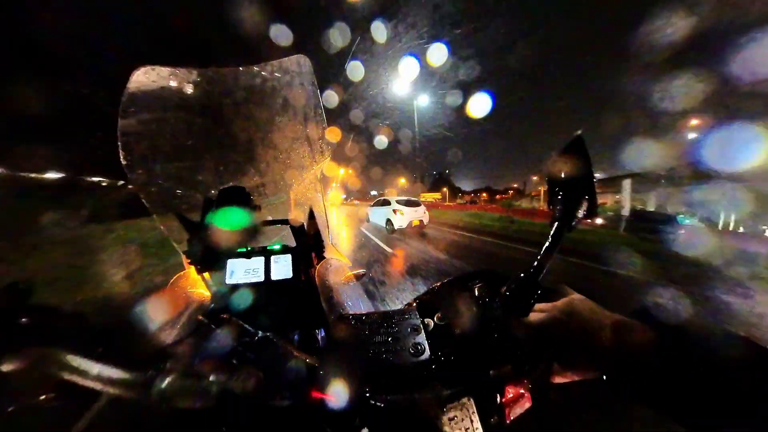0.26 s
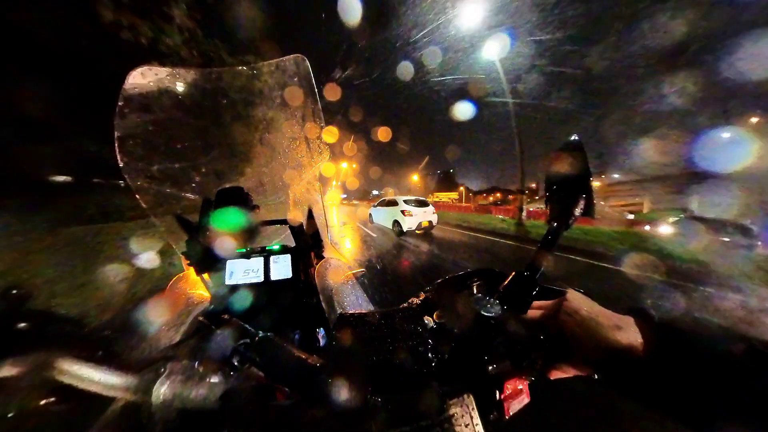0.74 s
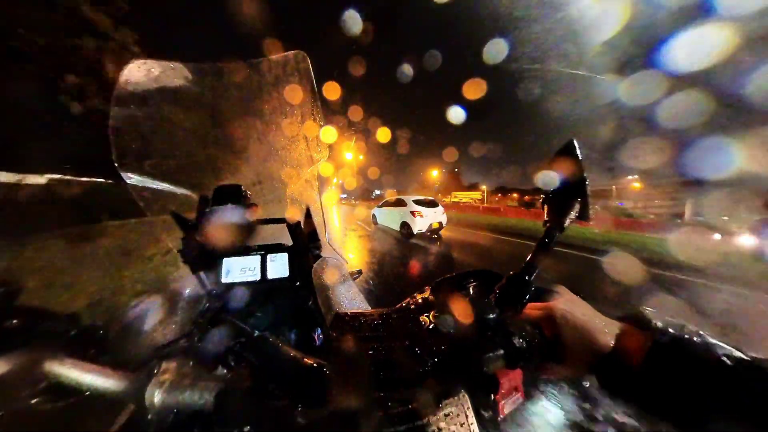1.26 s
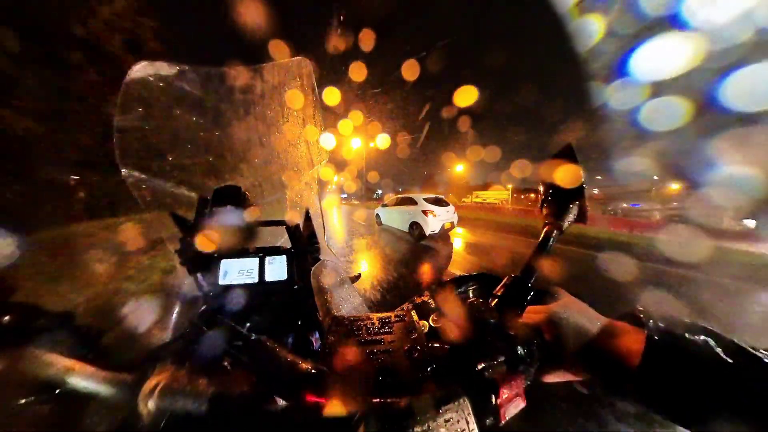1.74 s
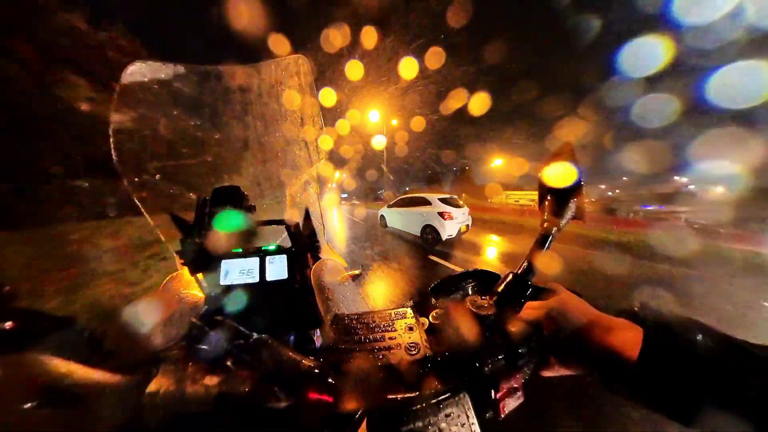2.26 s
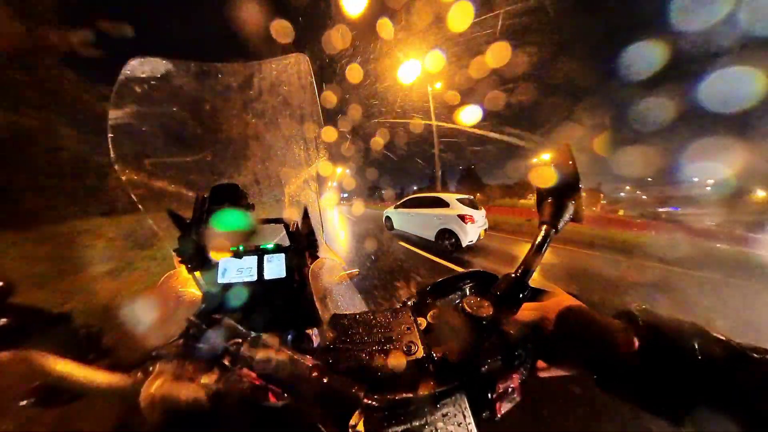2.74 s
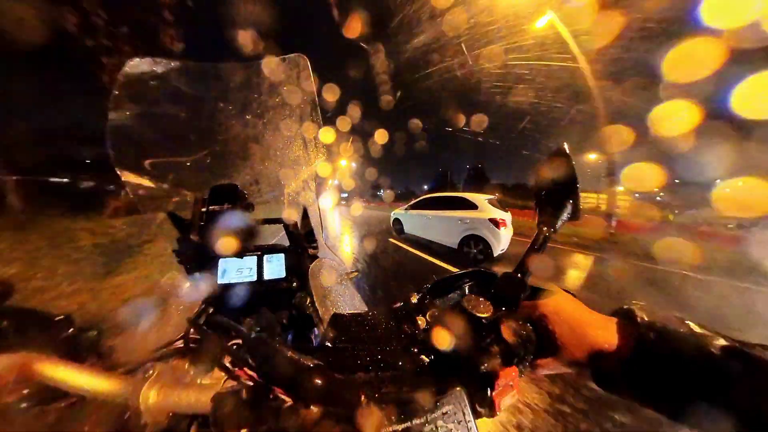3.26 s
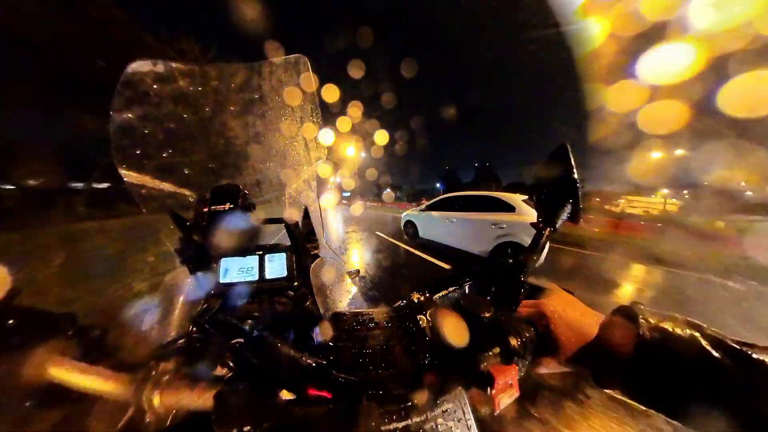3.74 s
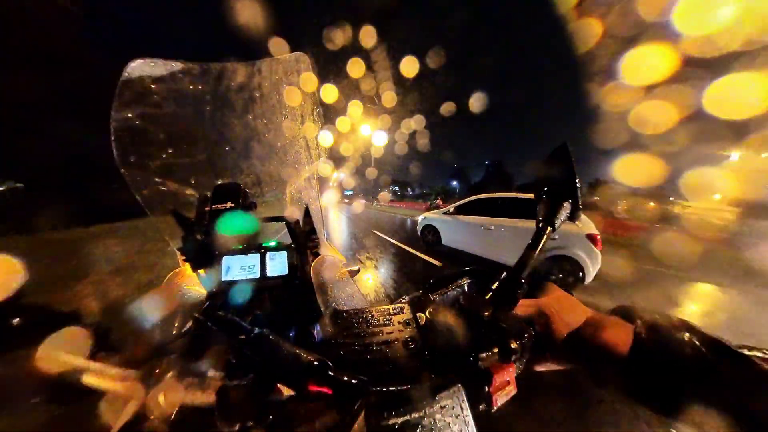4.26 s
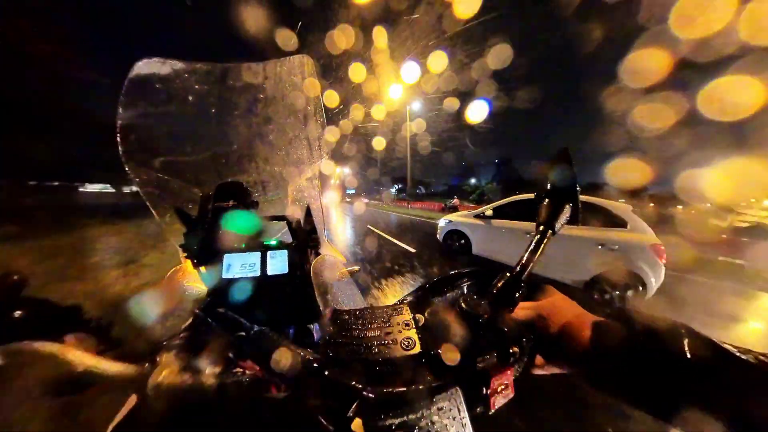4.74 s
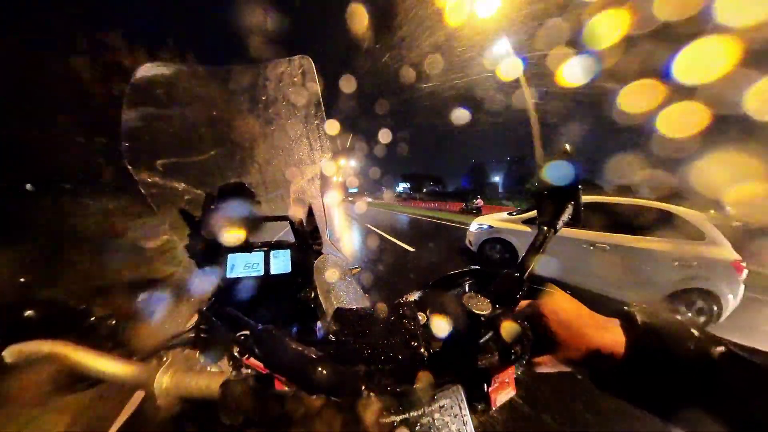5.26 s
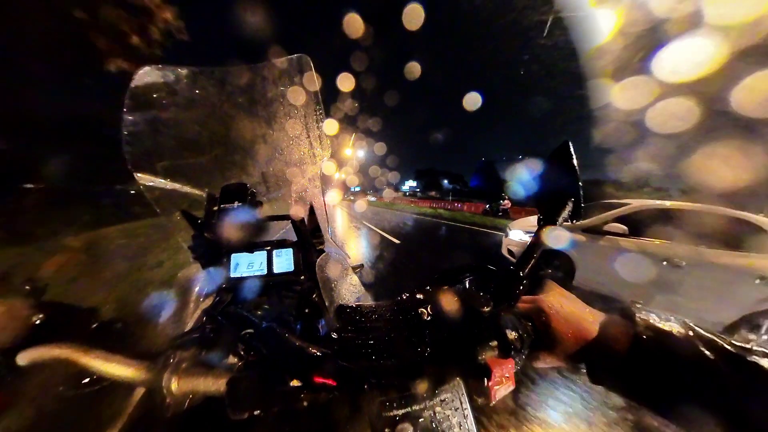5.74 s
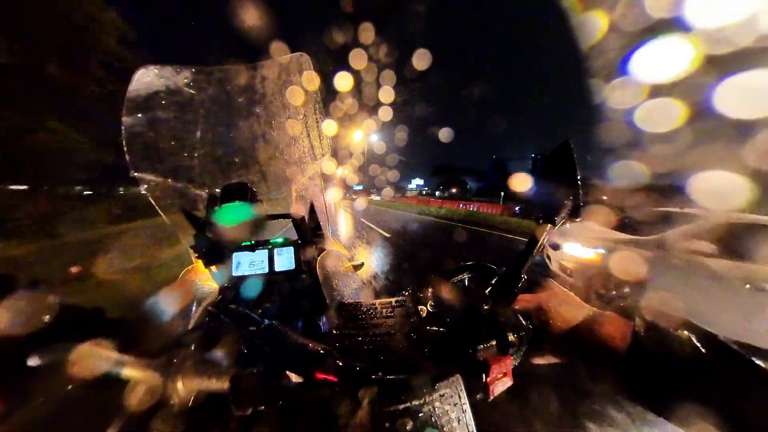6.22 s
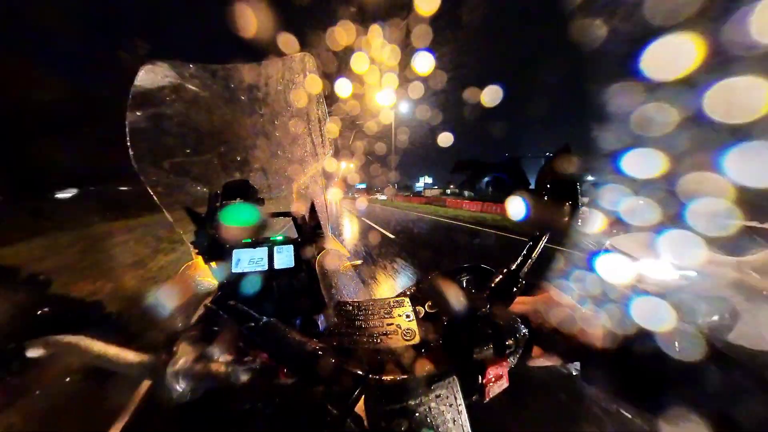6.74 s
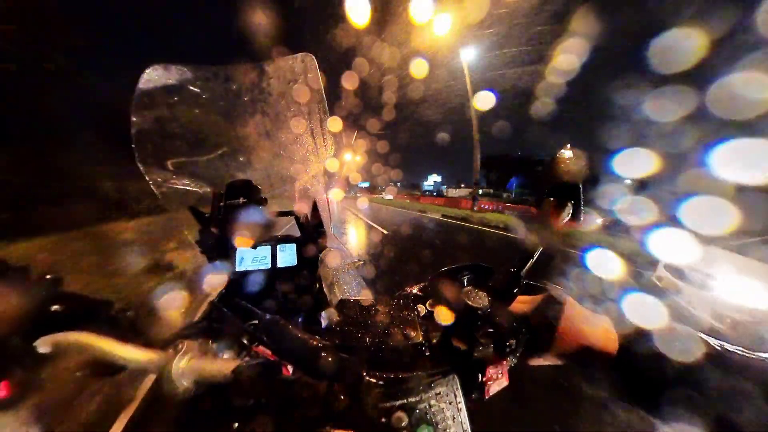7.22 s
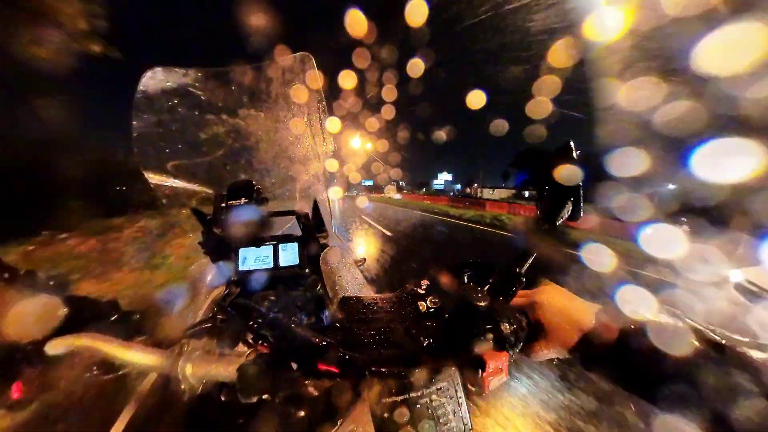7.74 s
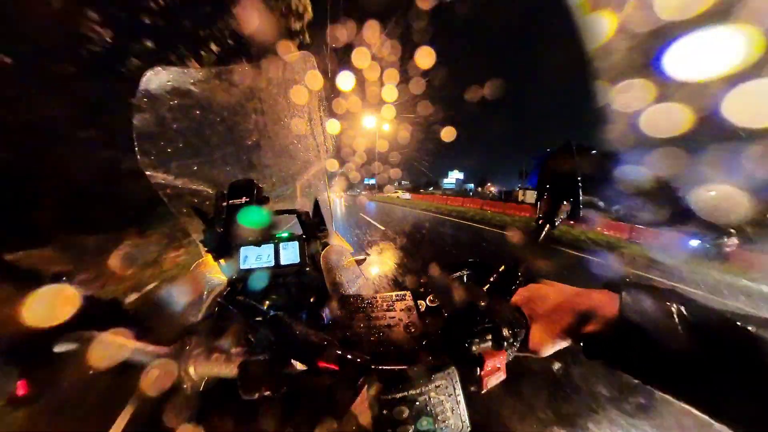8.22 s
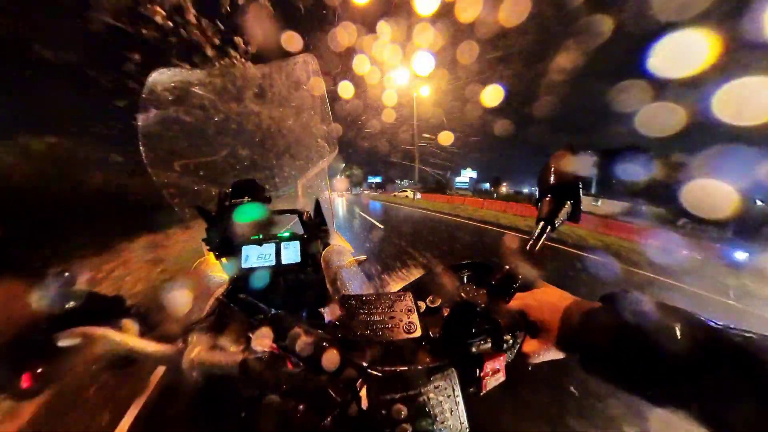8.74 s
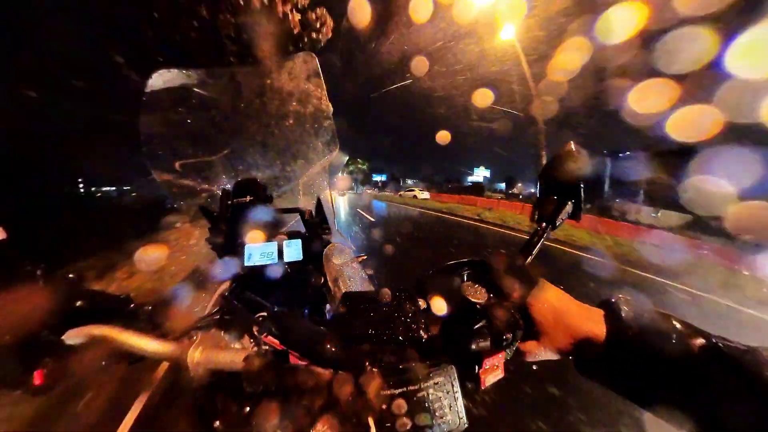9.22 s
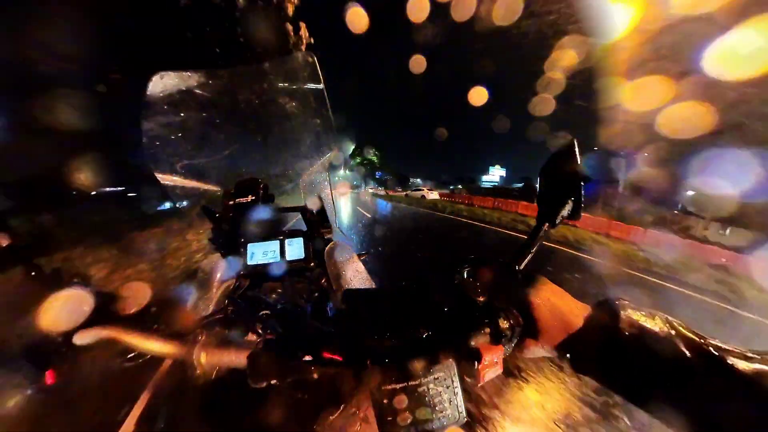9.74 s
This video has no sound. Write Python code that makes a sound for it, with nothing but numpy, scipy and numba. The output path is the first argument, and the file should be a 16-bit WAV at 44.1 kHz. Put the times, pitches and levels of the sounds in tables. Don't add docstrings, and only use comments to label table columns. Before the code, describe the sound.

A motorcycle drones steadily through hissing rain spray, buffeting wind and metal rattle, then the sound abruptly turns dull, boxy and mono, with knocks and ticking drops.

```python
import sys
import numpy as np
from scipy import signal
from scipy.fft import rfft, irfft, next_fast_len
from scipy.io import wavfile
from scipy.ndimage import uniform_filter1d, minimum_filter1d, map_coordinates
from numba import njit

SR = 44100
rng = np.random.default_rng(int(sys.argv[2]) if len(sys.argv) > 2 else 0)


def put_to_file(sound):
    columns = np.atleast_2d(sound).T
    safe = np.clip(columns, -1, 1)
    whole_steps = np.round(safe * 32767)
    wavfile.write(sys.argv[1], SR, whole_steps.astype(np.int16))


def volts_from_db(level):
    exponent = np.asarray(level, float) / 20
    return 10 ** exponent


N = 440118

SWITCH_S = 6.2195
PORT_LAG_S = .0001
# (time [s], state [0 pulling, 1 throttle shut, 2 slowed])
CASE_STATE = [
    (0, 0),
    (7.7, 0),
    (8.0, 1),
    (8.5, 1),
    (9.4, 2),
    (9.98, 2),
]


def read(rows):
    s, *columns = np.transpose(rows)
    return [np.interp(np.arange(N) / SR, s, c) for c in columns]


def at(points, hz):
    point_hz, value = np.transpose(points)
    return np.interp(np.log(hz), np.log(point_hz), value)


def unit(x):
    return x / np.sqrt(np.mean(x ** 2))


def walk(rate):
    hold = int(SR / rate)
    steps = np.repeat(rng.standard_normal(N // hold + 1), hold)
    return 1.41 * uniform_filter1d(uniform_filter1d(steps, hold), hold)[:N]


def swells(rows):
    t = np.arange(N) / SR
    return sum(db * np.exp(-((t - s) / half_s) ** 2) for s, db, half_s in rows)


def ring(x, hz, width_hz):
    return signal.lfilter(*signal.iirpeak(hz, hz / width_hz, SR), x)


def ring_twice(x, hz, width_hz):
    return ring(ring(x, hz, width_hz), hz, width_hz)


def noise(points, alike, flicker_db, rate, channels=2):
    # (frequency [Hz], left minus right [dB])
    left_over_right = [(60, -2), (100, 2.5), (180, -6), (310, 4), (530, 4), (920, 4), (1590, 3.5),
                       (2750, 6.5), (4750, 3), (8200, 4.5)]
    # (frequency [Hz], likeness [0-1])
    likeness = [(60, 1), (120, 1), (240, 0), (490, 0.6), (1000, 1), (2010, 0.4), (4060, 0), (8200, 0.94)]
    size = next_fast_len(N)
    hz = np.maximum(np.arange(size // 2 + 1) * SR / size, 1)
    common = rfft(rng.standard_normal(size))
    own = rfft(rng.standard_normal((channels, size)))
    share = np.clip(alike * at(likeness, hz), 0, 1)
    side = np.array([[.5], [-.5]])[:channels] * (channels - 1)
    lag = np.exp(-2j * np.pi * hz * (side + .5) * PORT_LAG_S * (hz > 250))
    lowest, highest = points[0][0], points[-1][0]
    colour = volts_from_db(at(points, hz) + side * at(left_over_right, hz)) * (hz > lowest) * (hz < highest)
    mix = (np.sqrt(share) * common * lag + np.sqrt(1 - share) * own) * colour
    place = 2 * np.log2(hz)
    total = 0
    for band in range(int(2 * np.log2(lowest)), int(2 * np.log2(highest)) + 2):
        window = np.clip(1 - np.abs(place - band), 0, 1)
        total = total + volts_from_db(flicker_db * walk(rate)) * irfft(mix * window, size)[:, :N]
    return unit(total)


def engine(cycle):
    # (multiple of cycle rate, left level [dB], right level [dB], left lead [rad])
    open_orders = [(2, -30, -29, 0.3), (3, -26, -23, 0.1), (4, -28, -19, -0.8), (5, -14, -18, 0.2),
                   (6, -19, -20, -0.2), (7, -29, -34, -1.6), (8, -39, -38, -2.7), (9, -21, -38, 2.6),
                   (10, -25, -18, -0.1), (11, -20, -18, -0.9), (12, -35, -33, -2.1), (13, -33, -24, -1.9),
                   (14, -31, -26, -1.0), (15, -32, -41, -0.2), (16, -25, -30, -0.3), (17, -31, -41, 0.4),
                   (18, -27, -33, -0.1), (19, -28, -35, -0.2), (20, -39, -44, -0.8), (21, -29, -36, -0.9),
                   (22, -35, -42, -0.1), (23, -44, -47, -0.4), (24, -36, -40, -0.3), (25, -41, -44, -0.5),
                   (26, -39, -47, -0.6), (27, -37, -44, -0.1), (28, -44, -51, 0.5)]
    # (multiple of cycle rate, level in state 0 [dB], in state 1 [dB], in state 2 [dB])
    case_orders = [(2, -32, -31, -30), (3, -20, -15, -19), (4, -23, -24, -16), (5, -24, -34, -31),
                   (6, -28, -23, -24), (7, -24, -31, -34), (8, -29, -31, -31), (9, -18, -17, -29),
                   (10, -19, -25, -24), (11, -34, -26, -21), (12, -41, -41, -36), (13, -35, -32, -42),
                   (14, -35, -61, -48), (15, -42, -45, -41), (16, -37, -37, -49), (17, -45, -55, -48),
                   (18, -46, -40, -39), (19, -46, -50, -52), (20, -49, -42, -49), (21, -36, -40, -43),
                   (22, -52, -45, -53), (23, -50, -45, -52), (24, -42, -45, -47), (25, -54, -54, -46),
                   (26, -50, -49, -48), (27, -51, -51, -57), (28, -60, -51, -53)]
    # (multiple, left change coasting [dB], right change coasting [dB],
    # left change at higher speed [dB], right change at higher speed [dB])
    pipe_shifts = [(3, 3, 1, -3, 3), (4, 3, 5, -2, -1), (6, 1, 1, -5, -10), (7, -1, 2, -5, -9),
                   (9, 4, 0, -7, 12), (10, -8, -10, 3, -1), (11, -10, -8, -7, -1), (13, -1, -5, 1, -8),
                   (14, -8, 0, 3, -11), (19, -3, 1, -7, -5), (21, -6, -3, 2, 2), (24, -2, -8, 5, 5),
                   (26, 5, 5, 0, 0), (27, 0, -3, 5, 5)]
    # (time [s], state [0 coasting, 1 pulling, 2 pulling at higher speed])
    open_state = [
        (0, 0),
        (1.08, 0),
        (1.2, .8),
        (2.3, 1),
        (5.4, 2),
        (9.98, 2),
    ]
    wobble_db, slip_rad = 1.2, .18
    bark_from, coast_bark_db, bark_db = 12, -4, .4
    ports, case, phase = np.zeros((2, N)), np.zeros(N), 0
    outside, inside = read(open_state)[0], read(CASE_STATE)[0]
    shifts = {k: change for k, *change in pipe_shifts}
    for (k, left_db, right_db, lead), (_, *case_db) in zip(open_orders, case_orders):
        bark = k >= bark_from
        change = shifts.get(k, [coast_bark_db * bark] * 2 + [0, 0])
        ports_db = np.array([change[:2], [0, 0], change[2:]]).T + [[left_db], [right_db]] + bark_db * bark
        angle = k * cycle + phase + slip_rad * walk(7)
        phase += np.pi * np.clip((9.5 - k) / 4, 0, 1) - .04 * max(k - 9, 0)
        phase += 1.25 * (k % 3 - 1) * (k > 9)
        size = np.sqrt(2) * volts_from_db(wobble_db * walk(5))
        tone, later = size * np.cos(angle), size * np.sin(angle)
        ports[0] += volts_from_db(np.interp(outside, range(3), ports_db[0])) * tone
        turned = np.cos(lead) * tone + np.sin(lead) * later
        ports[1] += volts_from_db(np.interp(outside, range(3), ports_db[1])) * turned
        case += volts_from_db(np.interp(inside, range(3), case_db)) * tone
    return ports, case


def beat(cycle, depth, sharp=3):
    first = np.exp(sharp * (np.cos(cycle - .1) - 1))
    second = np.exp(sharp * (np.cos(cycle - 2.4) - 1))
    return unit(1 + depth * (first + .5 * second))


def spray(cycle):
    # (frequency [Hz], level [dB per Hz])
    hiss_colour = [(350, -24), (600, -3), (900, -9), (1080, -1), (1200, -12.5), (1400, -14.5),
                   (1940, -11.5), (3740, -16.5), (5850, -15), (7000, -20), (7800, -28.5), (8600, -43.5),
                   (9300, -59)]
    # (time [s], level change [dB], half width [s])
    sheets = [(.13, 2, .05), (.72, 2, .05), (1.1, -5, .025), (1.2, -3.5, .025), (1.3, 1, 0.027),
              (1.52, -4, .04), (1.95, 1, .08), (2.35, -5, .025), (2.41, 2.5, 0.028), (2.62, -1, .05),
              (2.92, 2.5, .06), (4.4, -1.5, .07), (4.5, 0, .03), (5.0, -3.5, .04), (5.15, -7, .035),
              (5.29, -5.5, .035), (5.2, -3, 0.27), (6.12, -6, 0.055)]
    fade_db = -.5 * np.arange(N) / SR
    hiss_db = -28 + fade_db + swells(sheets) + .7 * walk(20)
    return volts_from_db(hiss_db) * beat(cycle, 0.077) * noise(hiss_colour, 0.82, 0.58, 12)


def wind():
    # (frequency [Hz], level [dB per Hz])
    wind_colour = [(20, -4), (35, -20), (60, 4), (100, -2.5), (200, -6.5), (350, -11), (600, -20.5),
                   (1000, -29.5), (1600, -47.5)]
    # (time [s], level change [dB], half width [s])
    gust_times = [
        (.15, 4.5, .08),
        (1.1, 4, 0.08),
        (1.52, 4, 0.076),
        (2.43, 5, .07),
        (3.73, 4, .08),
        (4.12, 4, .09),
        (4.4, 4.5, .06),
        (4.95, 3.5, .12),
        (5.67, 2.5, .07),
        (6.08, 5, .1),
    ]
    flutter = volts_from_db(0.83 * np.array([walk(10), walk(10)]) + 1.2 * walk(9))
    level_db = -18 + 0.33 * np.arange(N) / SR + swells(gust_times)
    return volts_from_db(level_db) * unit(flutter * noise(wind_colour, .1, 1.2, 12))


def clatter(cycle, engine_db):
    # (time [s], level change [dB], half width [s])
    judder = [
        (2.25, 3.5, .04),
        (4.16, 3.5, .03),
        (5.37, 3, .03),
        (6.13, 6, .07),
    ]
    common = rng.standard_normal(N)
    delay = np.array([[PORT_LAG_S * SR], [0]])
    shared = map_coordinates(common, [np.arange(N) - delay], order=0)
    rattle = rng.standard_normal((2, N)) * np.array([[1.3], [.8]]) + shared
    metal = 0
    for hz, width_hz, db in [(457, 100, -3), (830, 78, -2.5), (1080, 26, -10)]:
        metal = metal + volts_from_db(db) * np.array([ring(x, hz, width_hz) for x in rattle])
    level_db = -33 + .3 * engine_db + swells(judder) + 1.2 * walk(12)
    return volts_from_db(level_db) * beat(cycle, 0.53) * unit(metal)


def cavity_tones(cycle, since_s, shake_db):
    # (frequency [Hz], width [Hz], level [dB])
    pockets = [
        (902, 80, -5.5),
        (1092.5, 71, -2.5),
        (1417.6, 76, -7.5),
        (1527, 110, -15.5),
        (1242, 190, -15),
    ]
    tones = 0
    for hz, width_hz, db in pockets:
        shake = volts_from_db(0.81 * walk(15)) * rng.standard_normal(N)
        tones = tones + volts_from_db(db) * unit(ring_twice(shake, hz, 1.14 * width_hz))
    return volts_from_db(-22 + 0.15 * since_s + shake_db) * beat(cycle, 0.57) * tones


def case_rumble(cycle, level_db):
    # (frequency [Hz], level [dB per Hz])
    rumble_colour = [(20, -14.5), (45, 11), (100, 8), (180, 1.5), (300, -5.5), (700, -13.5), (1200, -3),
                     (1700, -20.5), (2100, -51), (2450, -34.5), (2800, -53.5), (3200, -44), (4000, -57.5),
                     (4300, -67.5), (7500, -81)]
    return volts_from_db(level_db) * beat(cycle, 0.48) * noise(rumble_colour, 0, 0.86, 12, channels=1)[0]


def case_boom(state, settle_db):
    # (level in state 0 [dB], in state 1 [dB], in state 2 [dB])
    state_boom = (-22, -20, -25.5)
    boom = unit(ring_twice(rng.standard_normal(N), 204.4, 29))
    return volts_from_db(np.interp(state, range(3), state_boom) + .7 * settle_db) * boom


def gear_whine(cycle, state):
    # (level in state 0 [dB], in state 1 [dB], in state 2 [dB])
    state_whine = (-41, -25.5, -22.5)
    whine = np.cos(54.7 * cycle + .3 * walk(12)) * volts_from_db(1.2 * walk(10))
    return volts_from_db(np.interp(state, range(3), state_whine)) * whine


def inside_case(cycle):
    # (time [s], level change [dB], half width [s])
    shakes = [
        (6.5, 2.5, .03),
        (7.02, 6, .05),
        (7.16, 3.5, .02),
        (7.25, 6.5, 0.024),
        (7.38, 4, .02),
        (7.6, 4.5, 0.026),
        (8.78, 2, .05),
        (9.25, 2, .03),
        (9.38, 1, .02),
        (9.7, 1, .03),
    ]
    state = read(CASE_STATE)[0]
    since_s = np.maximum(np.arange(N) / SR - SWITCH_S, 0)
    jolt_db = swells(shakes)
    settle_db = 3.5 * np.exp(-since_s / .1)
    tones = cavity_tones(cycle, since_s, jolt_db + settle_db)
    rumble = case_rumble(cycle, -19.5 + 0.81 * jolt_db + .6 * settle_db)
    return tones + rumble + gear_whine(cycle, state) + case_boom(state, settle_db)


def drops(patter_db=-66, rate=60):
    # (time [s], peak level [dB])
    big_drops = [(6.2433, -39), (6.2837, -41), (6.3037, -41), (6.3436, -37), (6.4433, -46), (6.6668, -47),
                 (6.9362, -47), (7.0121, -45), (7.0535, -46), (7.1028, -47), (7.2221, -46), (7.4535, -48),
                 (7.5867, -44), (7.7748, -44), (7.91, -47), (8.2313, -33), (8.344, -43), (8.6219, -48),
                 (8.7037, -32), (8.8733, -45), (8.9317, -47), (9.0779, -45), (9.0938, -36), (9.1746, -40),
                 (9.253, -46), (9.3757, -48), (9.667, -49), (9.6935, -43)]
    ticks = (rng.random(N) < rate / SR) * volts_from_db(patter_db + 4.5 * rng.exponential(size=N))
    for s, db in big_drops:
        ticks[int((s + .001) * SR)] += volts_from_db(db + 20)
    shell = [(2400, 1200, 6), (3400, 1200, 0), (5500, 2500, -17)]  # (frequency [Hz], width [Hz], level [dB])
    return sum(volts_from_db(db) * ring_twice(ticks, hz, width_hz) for hz, width_hz, db in shell)


def bumps():
    # (time [s], peak level [dB], frequency [Hz])
    knocks = [
        (6.619, -24, 470),
        (7.369, -24, 289),
        (8.458, -14, 398),
        (9.358, -19, 315),
    ]
    out, t = np.zeros(N), np.arange(2048) / SR
    for s, db, hz in knocks:
        start = int(s * SR)
        out[start:start + 2048] += volts_from_db(db - 2) * np.sin(2 * np.pi * hz * t) * np.exp(-t / 0.007)
    return out


def scene():
    # (time [s], engine cycle rate [Hz])
    cycle_rate = [(0, 19.45), (.5, 19.22), (.9, 19.09), (1.3, 19.34), (1.75, 19.59), (2.12, 19.9),
                  (2.88, 20.29), (3.62, 20.65), (5.12, 21.52), (5.88, 21.9), (6.62, 22.11), (7.4, 22.23),
                  (7.75, 22.13), (8.12, 21.72), (8.88, 20.94), (9.98, 19.93)]
    # (time [s], level [dB])
    loudness = [(0, -8), (2.9, -9), (4.1, -8.5), (5.3, -12.5), (6.0, -11), (6.2, -15.5), (6.25, -8.5),
                (6.97, -12), (8.1, -10), (9.0, -11.5), (9.98, -11)]
    hz, engine_db = read(cycle_rate)[0], read(loudness)[0] + 11
    cycle = 2 * np.pi * np.cumsum(hz) / SR
    ports, case = engine(cycle)
    outside = volts_from_db(engine_db - 1.5) * ports + spray(cycle) + wind() + clatter(cycle, engine_db)
    inside = volts_from_db(engine_db) * case + inside_case(cycle) + drops() + bumps()
    fade_s = 0.0081
    shut = np.clip((np.arange(N) / SR - SWITCH_S) / fade_s + .5, 0, 1)
    return (1 - shut) * outside + shut * inside


@njit
def limit(peak, ceiling, release):
    gain, g = np.empty(len(peak)), 1.
    for i in range(len(peak)):
        g = min(g + (1 - g) * release, ceiling / (peak[i] + 1e-9))
        gain[i] = g
    return gain


def thin_treble(x, open_hz=8650, case_hz=6800, ragged_hz=350):
    padded = np.pad(x, ((0, 0), (0, 2048)), "reflect")
    hz, s, spec = signal.stft(padded, SR, "cosine", nperseg=2048)
    held = np.arange(len(s)) // 2
    edge = np.where(s < SWITCH_S + .02, open_hz, case_hz) + ragged_hz * rng.standard_normal(len(s))[held]
    luck = rng.exponential(size=(len(hz) // 6 + 1, len(s)))
    luck = np.repeat(luck, 6, axis=0)[:len(hz), held]
    patch = hz[:, None] + 1600 * np.maximum(luck - .6, 0) < edge
    coarse = np.clip(1.25 - (edge - hz[:, None]) / 4000, 0, 1.1)
    strong = np.abs(spec) >= coarse * uniform_filter1d(np.abs(spec), size=24, axis=1)
    kept = spec * ((patch & strong) | (hz[:, None] < 2200))
    return signal.istft(kept, SR, "cosine", nperseg=2048)[1][:, :N]


def low_pass(x):
    return signal.sosfilt(signal.butter(12, 8800, fs=SR, output="sos"), x)


def record(dry):
    ceiling, release_s = 0.75, 0.04
    hot = volts_from_db(4.5) * signal.sosfilt(signal.butter(2, 28, "high", fs=SR, output="sos"), dry)
    ahead = -minimum_filter1d(-np.abs(hot), size=257, axis=1)
    gain = np.array([limit(p, ceiling, 1 / (release_s * SR)) for p in ahead])
    smooth = uniform_filter1d(uniform_filter1d(gain, size=129, axis=1), size=129, axis=1)
    mix = thin_treble(hot * smooth)
    return low_pass(mix)


dry = scene()
out = record(dry)
put_to_file(out)
```